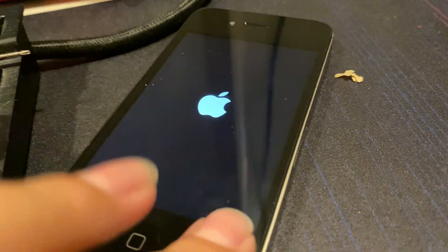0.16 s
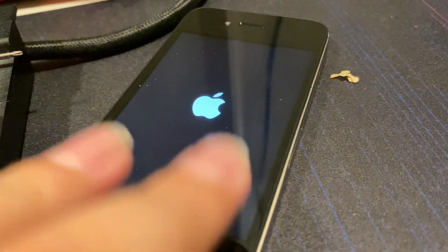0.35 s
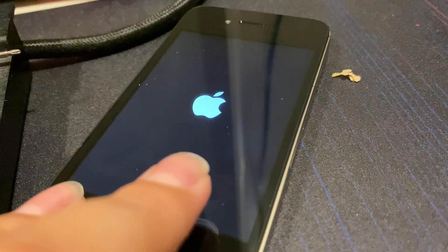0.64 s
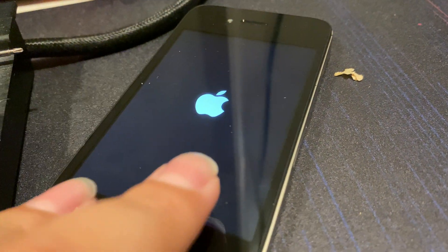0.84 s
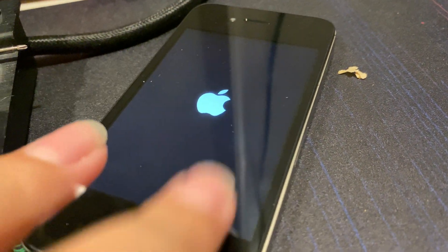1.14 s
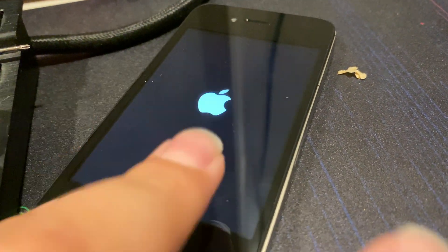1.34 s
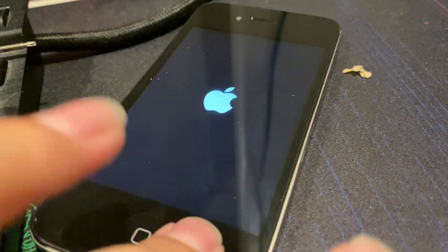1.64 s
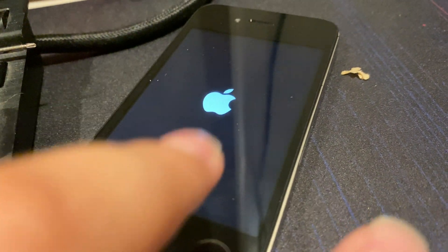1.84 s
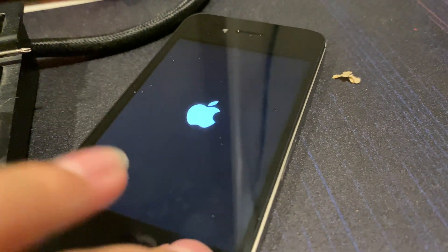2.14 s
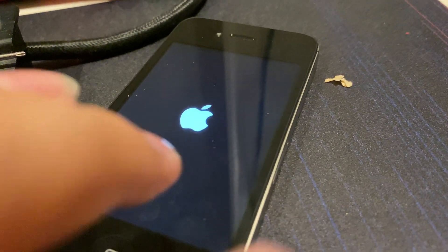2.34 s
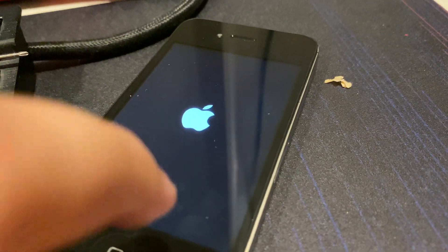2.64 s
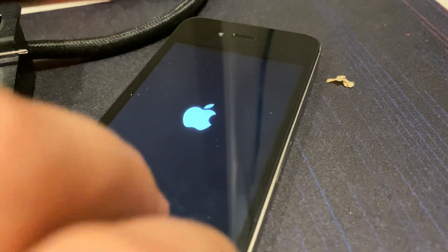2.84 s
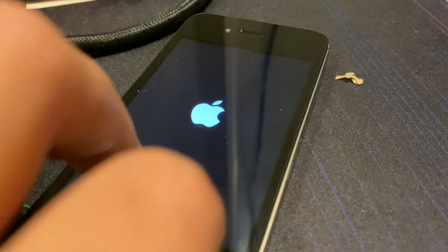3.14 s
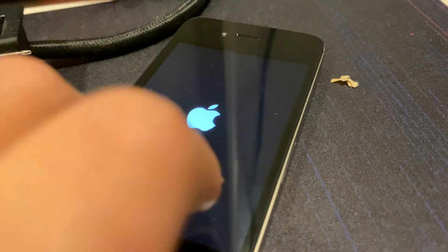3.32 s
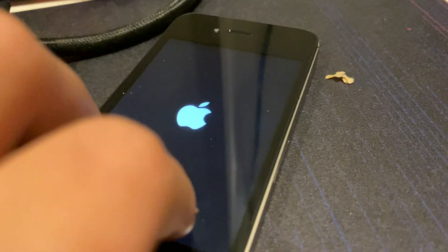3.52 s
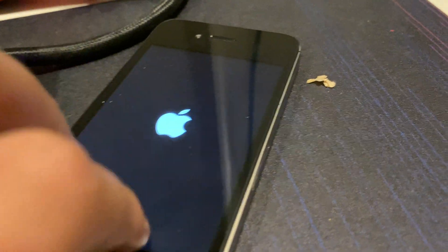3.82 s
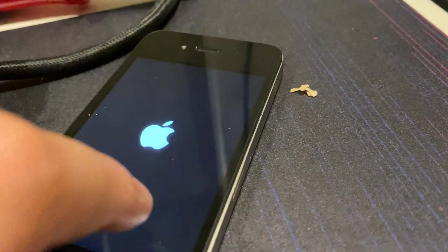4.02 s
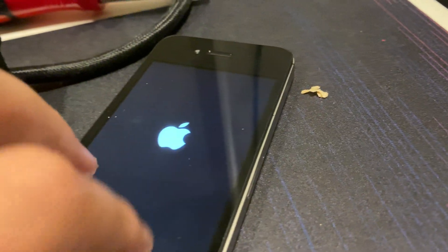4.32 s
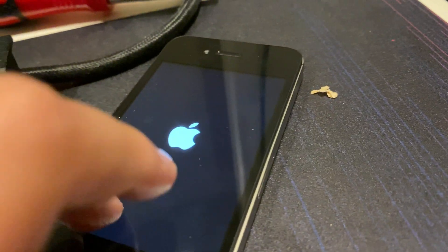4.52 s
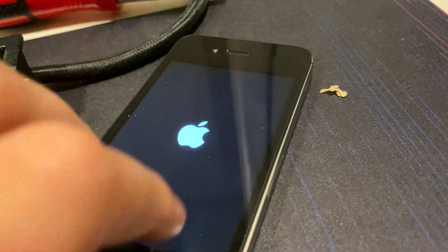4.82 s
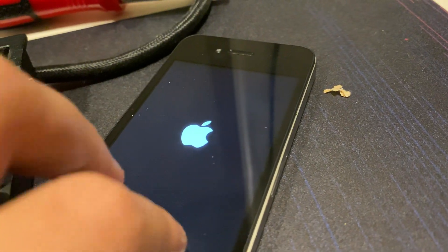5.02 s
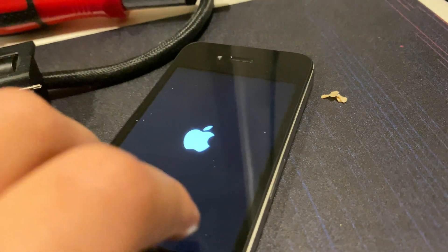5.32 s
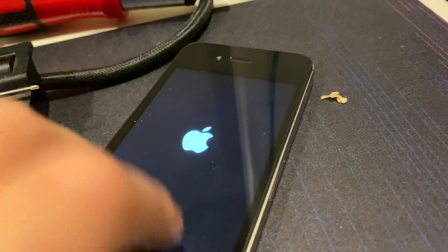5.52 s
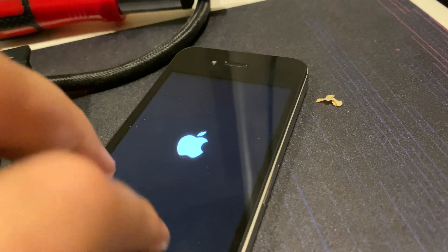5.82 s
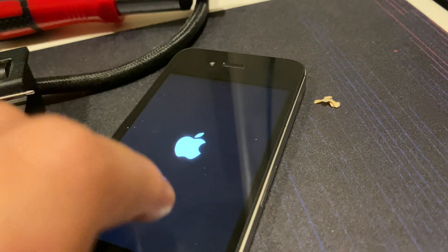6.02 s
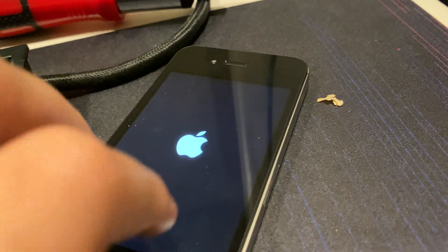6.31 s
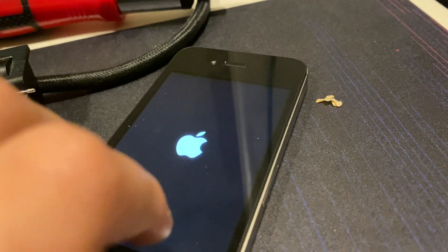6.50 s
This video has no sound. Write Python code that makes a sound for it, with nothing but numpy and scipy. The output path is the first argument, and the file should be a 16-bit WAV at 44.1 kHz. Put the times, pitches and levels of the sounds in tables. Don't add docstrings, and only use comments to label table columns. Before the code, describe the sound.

Soft, dull fingertip pats on a phone lying on a desk turn into brisk, clicking fingernail taps on its glass in a quiet room.

```python
import sys
import numpy as np
from scipy import signal
from scipy.fft import rfft, irfft, next_fast_len
from scipy.io import wavfile
from scipy.ndimage import uniform_filter1d, map_coordinates

SR = 44100
rng = np.random.default_rng(int(sys.argv[2]) if len(sys.argv) > 2 else 0)


def gain_from_db(level_db):
    decades = np.asarray(level_db, float) / 20
    return 10 ** decades


def to_wav(sig):
    pcm = np.clip(np.atleast_2d(sig), -1, 1) * 32767
    pcm = np.round(pcm).astype(np.int16)
    wavfile.write(sys.argv[1], SR, pcm.T)


N = 293706

# time_s, level_db
HAND_STIR = [(0.0, -62.5), (0.91, -60.5), (1.63, -63.5), (1.84, -54.5), (2.45, -60), (2.82, -60),
             (3.13, -57), (3.89, -59), (4.19, -58.5), (5.03, -57.5), (5.17, -57.5), (5.45, -52.5),
             (5.62, -62.5), (5.94, -47), (6.29, -62), (6.66, -52.5)]
# pitch_hz, level_db_per_hz
RUMBLE_TONE = [(15, -62), (25, -36), (43, 2.5), (70, 4.5), (129, 1.5), (200, -23.5), (260, -57),
               (440, -120)]
# pitch_hz, level_db_per_hz
HUM_TONE = [(71, -34.5), (120, -11.5), (189, -15), (292, -10.5), (356, -17.5), (500, -19.5), (521, -16.5),
            (1500, -43), (1950, -79.5), (3300, -120)]
# pitch_hz, level_db_per_hz
HISS_TONE = [(590, -19), (1000, -1), (1350, -4.5), (3120, -9.5), (5060, -11), (12300, -21.5), (13400, -36),
             (15000, -35), (15600, -22)]
# pitch_hz, likeness (-1 to 1)
LEFT_RIGHT_LIKENESS = [(60, 0.89), (130, 0.49), (290, 0.65), (640, -0.55), (1410, 0.0021), (3100, 0.061),
                       (6820, -0.095), (15000, 0.48)]
# pitch_hz, left_minus_right_db
LEFT_RIGHT_BALANCE = [(60, -5), (110, 4.5), (200, -2.5), (380, 7), (700, 4), (1290, 0.5), (2380, 1.5),
                      (4400, 3), (8120, 2), (15000, -6)]
# start_s, hold_s, level_db
RUSTLES = [(0.89, .03, -83.5), (1.77, 0.03, -80.5), (2.88, 0.15, -77.5), (3.122, 0.008, -74),
           (3.494, .055, -73.5), (3.96, .1, -82), (4.654, .03, -77.5), (4.89, 0.0234, -78),
           (5.48, 0.044, -75), (5.6, 0.055, -70), (5.84, 0.036, -69), (5.888, 0.0087, -66),
           (5.95, 0.046, -76.5), (6.29, 0.025, -75.5), (6.476, 0.0064, -64.5), (6.556, 0.016, -65)]
# pitch_hz, level_db_per_hz
CLOTH_TONE = [(410, -50), (700, -11), (1340, -12), (2490, -11.5), (2960, -19.5), (4580, -16.5),
              (9600, -34.5), (11200, -28), (13200, -86.5), (15900, -34), (16500, -52)]
# start_s, hold_s, level_db
SLIDES = [
    (5.46, 0.077, -71.5),
    (5.6, 0.23, -72),
]
# pitch_hz, level_db_per_hz
SKIN_TONE = [(1200, -36), (1900, -7), (2600, -4), (3300, -22), (4650, 11), (5600, -26), (11200, -25),
             (13000, -44)]
# start_s, hold_s, level_db
GRAZES = [
    (5.93, 0.056, -99),
    (6.27, 0.148, -77.5),
]
# pitch_hz, level_db_per_hz
GRAZE_TONE = [(8000, -38), (10200, -10), (11300, -6), (12300, -20), (13000, -48)]
# start_s, desk_thump_db, deep_thud_db, firmness_db
PAD_TAPS = [
    (0.2062, -56.5, -51.5, -40.5),
    (1.012, -57.5, -52.5, -33),
    (1.3489, -56.5, -57.5, -13.5),
    (1.6356, -51.5, -43.5, -17),
    (1.862, -52, -54, -7),
    (2.1595, -42.5, -37, -21),
]
# start_s, desk_thump_db, nail_click_db, edge_above_8_khz_db, glass_ring_over_usual_db
NAIL_TAPS = [(2.4843, -40, -42.5, -18.5, -2), (2.7124, -40, -40.5, -12, 0), (2.9505, -28.5, -27, -12, 0),
             (3.1944, -29, -30, -8.5, 5), (3.2911, -31, -26, -15.5, 1), (3.5665, -30.5, -30, -6, 0),
             (3.6548, -33, -30, -15.5, -3.5), (3.8718, -31.5, -29, -6.5, 1.5), (4.08, -31, -27.5, -14, -1),
             (4.3025, -31.5, -30.5, -4.5, -1.5), (4.5057, -32, -29, -12.5, -2),
             (4.725, -33, -32.5, -7.5, -2.5), (4.9332, -33, -31, -13, -4.5), (5.03, -34.5, -29.5, -5.5, 1),
             (5.1381, -31.5, -27.5, -10, -0.5), (5.244, -33, -30.5, -6, 0.5), (5.35, -27, -25, -11.5, -0.5),
             (5.4313, -32.5, -30.5, -3.5, 2), (5.5582, -27.5, -25.5, -10.5, -0.5),
             (5.7627, -28.5, -25.5, -7.5, 3), (6.0062, -27, -25, -13, 1), (6.2225, -32, -29.5, -5, 1),
             (6.4242, -28.5, -28, -10, -2), (6.6483, -37, -35, -9, -2.5)]
# pitch_hz, level_db
NAIL_TONE = [(900, -60.5), (1500, -37), (2200, 3), (3000, -3.5), (3700, 3), (4600, 8), (5800, 3.5),
             (7100, 2.5), (9000, -7.5), (11200, -1.5), (13000, -5.5), (15000, -10), (17000, -17.5)]
# pitch_hz, level_db, time_to_fall_60_db_s
GLASS_MODES = [(902.6, 4, 0.031), (1006, 16, 0.0068), (1238.6, 27, 0.0029)]
# pitch_hz, level_db, time_to_fall_60_db_s
DESK_MODES = [(131, -16.5, 0.13), (195.2, -9, 0.15), (237.3, -4.5, 0.15), (295, -8, 0.015),
              (311, -7, 0.056), (399.3, -8.5, 0.048), (608, -0.5, 0.036), (650, -2.5, 0.0097),
              (897, -8, 0.026)]
# start_s, peak_db, brightness_above_7_khz_db, knock_db
TICKS = [(0.6128, -40.5, -6, -10), (0.6213, -30, 7.5, -13), (0.6334, -33, 0, 1), (0.651, -48, -27, 5),
         (0.7464, -50, -43, -30), (0.7529, -52, -54, 10), (1.0095, -76.5, 12, -10), (0.8894, -67, -25, 13),
         (0.9197, -64, -17, -9), (1.664, -40.5, -42, -1), (1.6994, -62, -4, 18), (1.8903, -52, -39, 6),
         (2.0736, -54, -47, 15), (3.495, -59, 6, -5), (5.8869, -47, -44, 22.5), (5.9044, -51, -28, 18),
         (6.4764, -47.5, -11, 0), (6.5538, -56, -23, 15.5)]
# start_s, peak_db, pitch_hz, time_to_fall_60_db_s
BUMPS = [
    (0.64, -49, 56, 0.24),
    (4.1, -37.5, 54.8, 0.3),
    (5.887, -31, 124.4, 0.14),
    (5.947, -42, 145.4, 0.059),
    (6.501, -44, 55, 0.42),
    (6.571, -44, 89.2, 0.044),
]
# start_s, hold_s, level_db
SCUFFS = [
    (0.88, 0.0196, -66.5),
    (1.11, 0.013, -60.5),
    (1.94, 0.035, -41),
]
# pitch_hz, level_db_per_hz
DRAG_TONE = [(47, -41), (80, -25), (167, -20), (243, -6.5), (624, -18), (837, -20), (1470, -27.5),
             (2150, -41.5), (12000, -65.5), (15600, -75), (22000, -120)]
# pitch_hz, left_minus_right_db
PORT_BALANCE = [(50, 3.5), (120, 11.5), (240, 4), (350, 5), (600, 10.5), (1000, 17.5), (1300, 10),
                (1600, 3), (2200, 11), (3000, 1), (4000, 6), (6000, 7), (9000, 5.5), (15000, -5)]
# pitch_hz, left_lead_radians
PORT_LEAD = [(0, 0), (340, 0.6), (780, -3.7), (1380, -3.5), (2580, -2.9), (3700, 0.9), (4740, 9.0),
             (5770, 9.5), (7240, 12.8), (8530, 9.6), (8960, 9.5), (14800, 0.7), (15800, -0.5), (16700, 0.1)]
# pitch_hz, time_to_fall_60_db_s
ROOM_FADE = [(100, 0.28), (300, 0.31), (700, 0.27), (2000, 0.26), (5000, 0.24), (9000, 0.24), (14000, 0.43)]
# pitch_hz, level_db
ROOM_LEVEL = [(100, -18), (400, -7), (1500, -16), (3000, -10), (5000, -17.5), (8000, -14), (12000, -24),
              (13200, -39), (14500, -21), (15600, -31), (16000, -52.5)]


def unit(x):
    return x / np.sqrt(np.mean(x ** 2) + 1e-20)


def along(points, hz):
    f, v = np.transpose(points)
    return np.interp(np.log(hz + 1), np.log(f + 1), v)


def curve(rows):
    return np.interp(np.arange(N) / SR, *np.transpose(rows))


def wobble(rate):
    knots = rng.standard_normal(int(N * rate / SR) + 4)
    return map_coordinates(knots, [np.arange(N) * rate / SR])


def filtered(x, response):
    m = 2 * next_fast_len(N // 2 + SR // 4)
    return irfft(rfft(x, m) * response(np.fft.rfftfreq(m, 1 / SR)), m)[..., :N]


def causal(points, hz):
    c = irfft(np.log(gain_from_db(along(points, hz))))
    c[1:len(c) // 2] *= 2
    c[len(c) // 2 + 1:] = 0
    return np.exp(rfft(c))


def ring(modes, t, spread_db, attack):
    x = np.zeros(len(t))
    for hz, db, t60 in modes:
        fade = gain_from_db(db + spread_db * rng.standard_normal() - 60 * t / t60)
        x += fade * np.sin(2 * np.pi * hz * t)
    x = x * (1 - np.exp(-t / attack))
    return x / np.abs(x).max()


def add(track, s, x):
    i = round(s * SR)
    track[i:i + len(x)] += x


def strokes(rows, rise, fall):
    t = np.arange(N) / SR
    gain = np.zeros(N)
    for s, hold, db in rows:
        before, after = np.maximum(s - t, 0), np.maximum(t - s - hold, 0)
        gain += gain_from_db(db - 60 * before / rise - 60 * after / fall)
    return gain


def rush(tone):
    def middle_and_side(hz):
        turn = np.arccos(np.clip(along(LEFT_RIGHT_LIKENESS, hz), -1, 1)) / 2
        return gain_from_db(along(tone, hz)) * (hz < 15800) * np.array([np.cos(turn), np.sin(turn)])

    mid, side = filtered(rng.standard_normal((2, N)), middle_and_side)
    balance = lambda hz: gain_from_db(np.outer([0.5, -0.5], along(LEFT_RIGHT_BALANCE, hz)))
    return unit(filtered(np.array([mid + side, mid - side]), balance))


def background():
    stir_db = curve(HAND_STIR) + 57
    rumble_db = -58.5 + 0.82 * stir_db + 2.4 * wobble(15) + 1.1 * wobble(2.7)
    rumble = gain_from_db(rumble_db) * rush(RUMBLE_TONE)
    hum = gain_from_db(-60.5 + stir_db + 1.5 * wobble(21)) * rush(HUM_TONE)
    rustle = strokes(RUSTLES, rise=0.04, fall=0.26) * gain_from_db(4.0 + 0.48 * wobble(19)) * rush(CLOTH_TONE)
    slide = strokes(SLIDES, rise=0.15, fall=0.21) * rush(SKIN_TONE)
    graze = strokes(GRAZES, rise=0.19, fall=0.22) * rush(GRAZE_TONE)
    hiss = gain_from_db(-81.5) * rush(HISS_TONE)
    return rumble + hum + rustle + slide + graze + hiss


def blows():
    taps_list = []
    for s, thump, thud, firm in PAD_TAPS:
        click = thump + 1.84 * firm + 12.5
        taps_list.append((s, click, -16, thump + firm, thump, thud))
    for s, thump, click, edge, extra_ring in NAIL_TAPS:
        glass = -38 + 0.87 * (thump + 29) + extra_ring
        thud = thump - 16.5 - 2.8 * (click - thump)
        taps_list.append((s, click, edge, glass, thump, thud))
    return taps_list


def contact(noise):
    t = np.arange(len(noise)) / SR
    burst = noise * gain_from_db(12 - 60 * t / 0.0022)
    burst[[0, 9, 22]] += [2.5, -1.5, 1.1]
    z = rfft(burst)
    return irfft(z / uniform_filter1d(np.abs(z), size=13)) * (t < 0.006)


def nail_click(habit):
    burst = contact(habit + 0.27 * rng.standard_normal(512))
    t = np.arange(400) / SR
    burst[:400] += rng.standard_normal(400) * gain_from_db(-30.5 - 60 * t / 0.016)
    return burst


def desk_thump(t, soft):
    push = 1.23 * np.exp(-((t - 0.0015) / (0.00029 * soft)) ** 2)
    modes = [(hz * (1 + 0.021 * rng.standard_normal()), db - 0.017 * hz * (soft - 1), t60)
             for hz, db, t60 in DESK_MODES]
    wood = ring(modes, t, spread_db=2.0, attack=0.00005 * soft ** 3.37)
    return np.pad(wood, (88, 0))[:len(t)] - push


def deep_thud(t):
    modes = [(hz * (1 + 0.039 * rng.standard_normal()), db, t60)
             for hz, db, t60 in [(52.0, 0.5, 0.14), (75.0, 0.5, 0.22), (115, -1.5, 0.11)]]
    return ring(modes, t, spread_db=12.0, attack=0.0025)


def taps():
    nail, body, t = np.zeros((2, N + SR)), np.zeros(N + SR), np.arange(SR // 3) / SR
    habit = rng.standard_normal(512)
    for s, click_db, edge_db, glass_db, thump_db, thud_db in blows():
        click = nail_click(habit)
        add(nail[0], s, gain_from_db(click_db + 19.0) * click)
        add(nail[1], s, gain_from_db(click_db + edge_db + 30.5) * click)
        glass = ring(GLASS_MODES, t, spread_db=-2.3, attack=0.002)
        add(body, s + 0.00027, gain_from_db(glass_db + 13.5) * glass)
        soft = 0.5 + 0.044 * np.clip(thump_db - click_db + 23.5, 0, 40)
        add(body, s + 0.003203, gain_from_db(thump_db + 10) * desk_thump(t, soft))
        add(body, s + 0.0035, gain_from_db(thud_db + 8.5) * deep_thud(t))

    def click_and_edge(hz):
        top = 1 / (1 + (8000 / (hz + 1)) ** 8)
        return causal(NAIL_TONE, hz) * np.array([1 - top, top])

    return filtered(nail[:, :N], click_and_edge).sum(0) + body[:N]


def room(x):
    out, step = np.zeros((2, N + SR)), SR // 3
    for i in range(0, N, step):
        hz, t, z = signal.stft(rng.standard_normal((2, SR // 2)), SR, nperseg=256)
        fade = gain_from_db(-60 * t / along(ROOM_FADE, hz)[:, None])
        tail = signal.istft(z * fade, SR, nperseg=256)[1]
        tail = tail * (1 - np.exp(-np.arange(tail.shape[1]) / 90))
        tail = np.pad(tail, ((0, 0), (60, 0))) / np.linalg.norm(tail[0])
        wet = signal.fftconvolve(x[None, i:i + step], tail, axes=1)
        out[:, i:i + wet.shape[1]] += wet
    return filtered(out[:, :N], lambda hz: gain_from_db(along(ROOM_LEVEL, hz)))


def ports(x):
    right = lambda hz: gain_from_db(-along(PORT_BALANCE, hz)) * np.exp(-1j * along(PORT_LEAD, hz))
    return np.array([x, filtered(x, right)])


def ticks():
    tracks, t = np.zeros((3, N + SR)), np.arange(SR // 10) / SR
    for s, db, bright_db, knock_db in TICKS:
        shape = gain_from_db(db - 60 * t / 0.028) * (1 - np.exp(-t / 0.00054))
        crack = shape * rng.standard_normal(len(t))
        add(tracks[0], s, gain_from_db(knock_db + 14) * crack)
        add(tracks[1], s, gain_from_db(5.0) * crack)
        add(tracks[2], s, gain_from_db(bright_db - 3.5) * crack)

    def bands(hz):
        low = (hz / 150) ** 2 / (1 + (hz / 150) ** 2) / (1 + (hz / 700) ** 4)
        middle = 1 / (1 + (1100 / (hz + 1)) ** 4) / (1 + (hz / 5000) ** 4)
        high = 1 / (1 + (6000 / (hz + 1)) ** 6) / (1 + (hz / 13500) ** 6)
        return np.array([low, middle, high])

    return filtered(tracks[:, :N], bands).sum(0)


def bumps():
    out, t = np.zeros(N + SR), np.arange(SR // 2) / SR
    for s, db, hz, t60 in BUMPS:
        modes = [(hz, 0, t60), (1.6 * hz, -6, t60), (2.2 * hz, -13, 0.9 * t60)]
        add(out, s, gain_from_db(db + 4) * ring(modes, t, spread_db=3, attack=0.0035))
    return out[:N]


def scuff():
    grips = rng.standard_normal(N) * gain_from_db(0.77 * wobble(70.9))
    level = gain_from_db(6.0) * strokes(SCUFFS, rise=0.062, fall=0.15)
    return level * unit(filtered(grips, lambda hz: gain_from_db(along(DRAG_TONE, hz))))


def scene():
    near = taps() + ticks() + bumps() + scuff()
    return ports(near) + room(near) + background()


def roll_off(x):
    return signal.sosfilt(signal.butter(12, 17160, fs=SR, output="sos"), x)


def record(dry):
    band = lambda hz: 1 / (1 + (hz / 16400) ** 60) / (1 + (32 / (hz + 1)) ** 4)
    return roll_off(filtered(dry, band))


dry = scene()
out = record(dry)
to_wav(out)
```